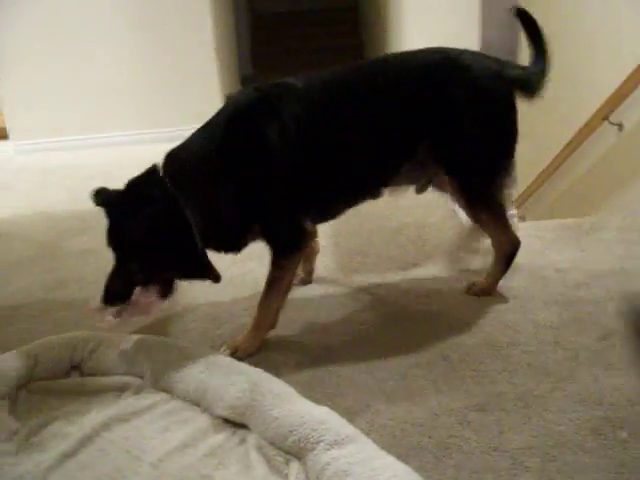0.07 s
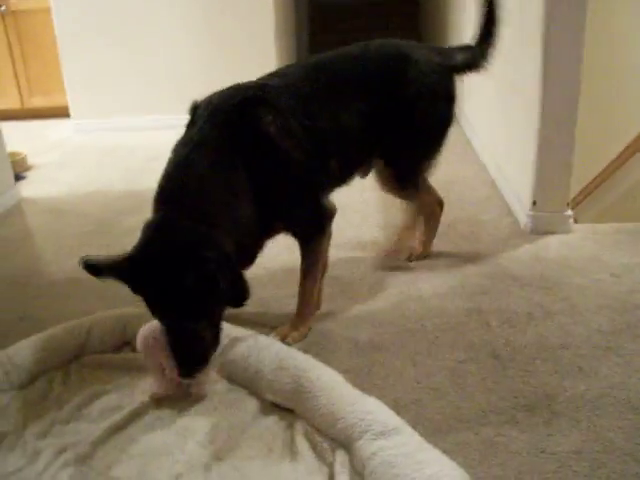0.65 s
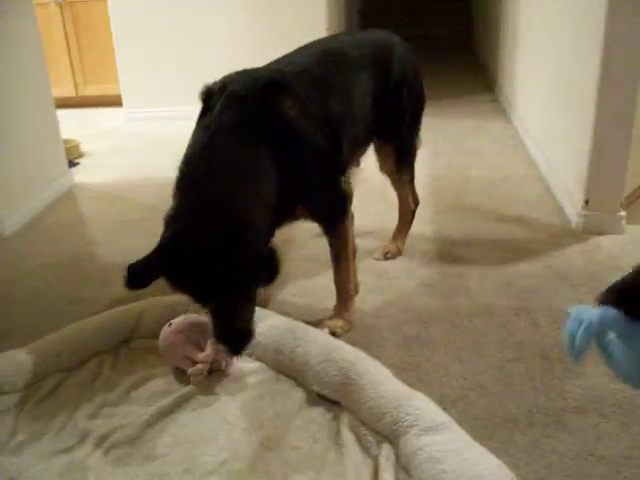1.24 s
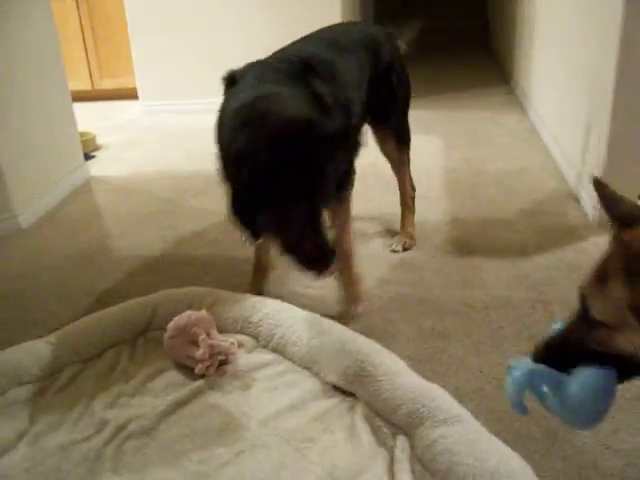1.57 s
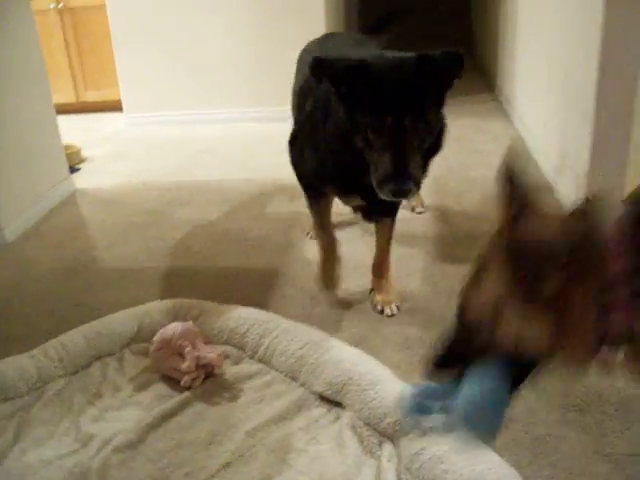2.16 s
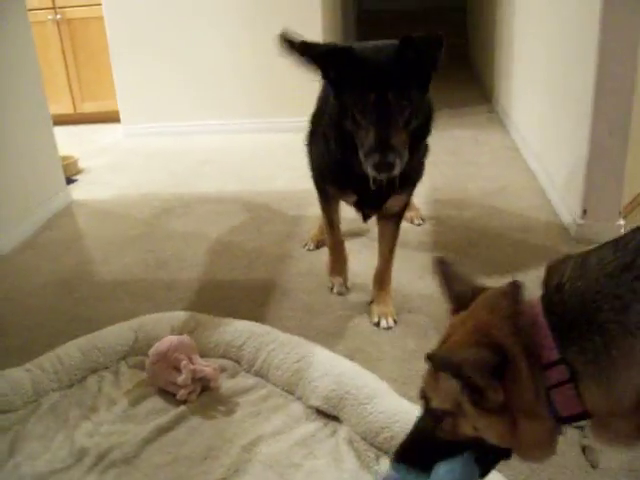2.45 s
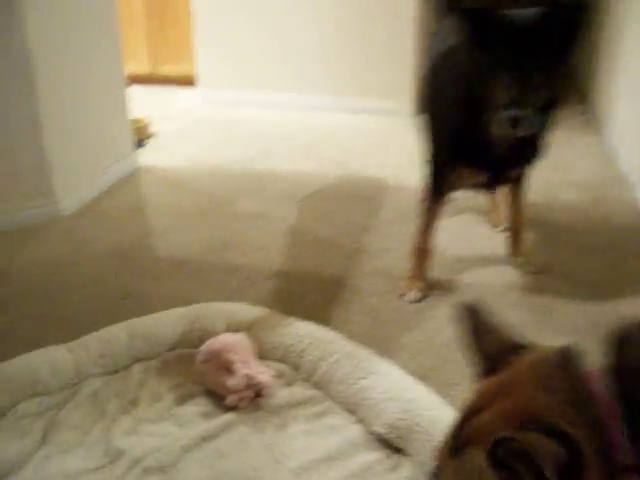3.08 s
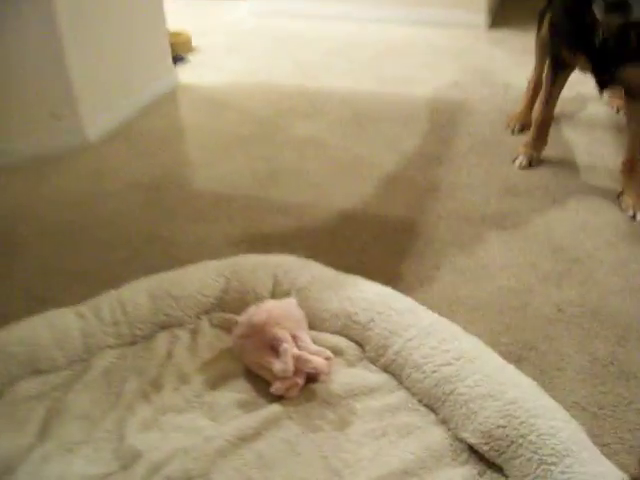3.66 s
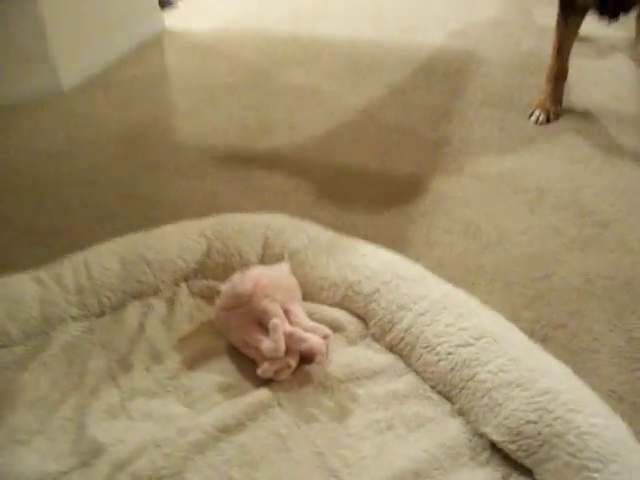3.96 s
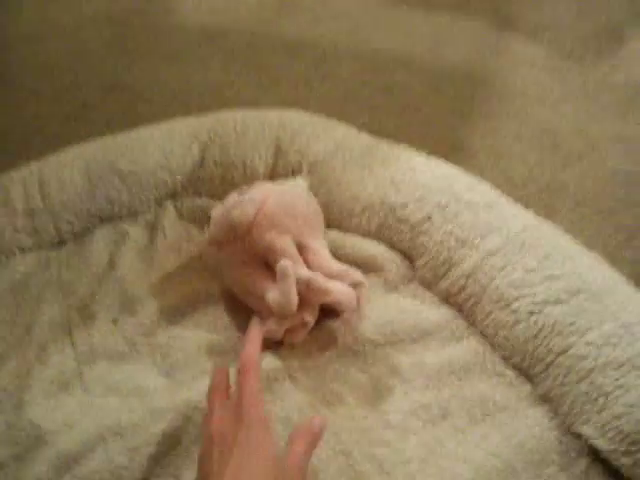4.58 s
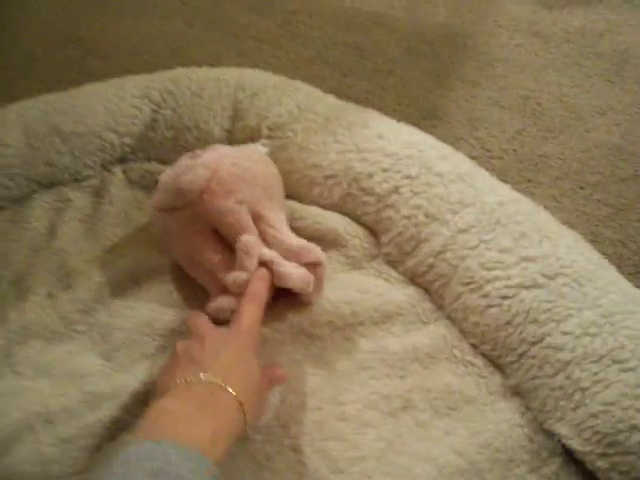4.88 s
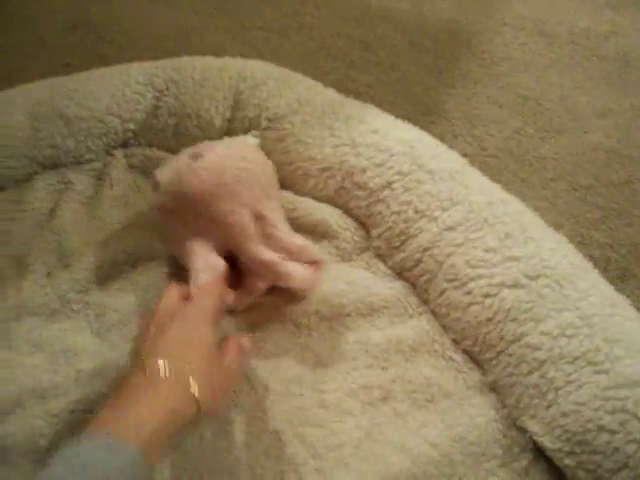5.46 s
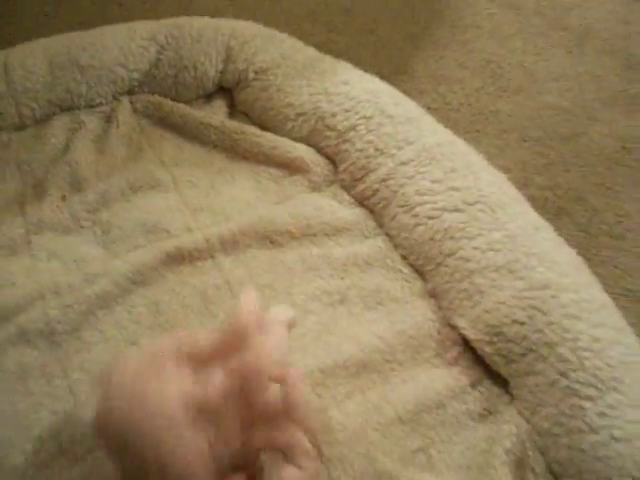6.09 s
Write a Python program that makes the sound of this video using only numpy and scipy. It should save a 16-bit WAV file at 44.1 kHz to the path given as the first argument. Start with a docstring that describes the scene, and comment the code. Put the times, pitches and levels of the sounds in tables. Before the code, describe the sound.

Dog collar tags jingle between quick chirps from a chewed squeaky toy, then give way to faint clicks and fabric rustle.

```python
"""Two dogs play on carpet, close to a hand-held camera that rumbles as it swings at the start. One chews
a plush toy: each bite drives air through the squeaker's reed, which chirps up, then down as the air runs
out; at 1 s a hard bite makes it whistle. Collar tags jingle hardest just before 2 s, jaws click, and a
hallway rings briefly behind them. The squeaks stop by 4 s, leaving a few clinks and clicks, soft thuds
and rustling plush. Near 6 s the toy is dragged over the dog bed."""
import sys
import numpy as np
from scipy import signal
from scipy.fft import rfft, irfft
from scipy.io import wavfile

SR = 44100
rng = np.random.default_rng(int(sys.argv[2]) if len(sys.argv) > 2 else 0)


def int16_out(signal):
    """Quantize to a 16-bit WAV file."""
    q = np.round(np.clip(np.atleast_2d(signal).T, -1, 1) * 32767)
    wavfile.write(sys.argv[1], SR, q.astype(np.int16))


N = 279143
TIME = np.arange(N) / SR

# colour of the room tone: (frequency [Hz], level [dB])
ROOM_TONE_EQ = [(12, -2.5), (22, 1), (50, -14), (120, -17.5), (160, -23.5), (240, -34), (450, -40),
                (700, -37.5), (2000, -57.5), (5000, -53), (7400, -38), (9000, -70.5)]
# soft thuds on the floor: (time [s], level [dB], pitch [Hz])
FLOOR_THUDS = [(4.051, -37.5, 60.4), (5.625, -46, 75), (6.000, -43, 109.4)]
# colour of rubbed plush: (frequency [Hz], level [dB])
PLUSH_EQ = [(80, -18.5), (150, 0.5), (300, 0), (465, -1.5), (650, -8.5), (1200, -8), (2700, -11),
            (7100, -10.5), (7900, -21), (9000, -36)]
# dull colour of the dog bed: (frequency [Hz], level [dB])
BED_EQ = [(80, -15), (160, -3), (450, -1), (700, -4.5), (1500, -8.5), (2800, -8.5), (5000, -13.5),
          (7400, -14.5), (9000, -36)]
# rubs of plush and bedding: (time [s], length [s], level [dB])
PLUSH_RUBS = [(0, 0.044, -49.5), (0.22, 0.59, -57.5), (1.2, 0.44, -58), (2.55, 0.29, -58.5),
              (3.4, 0.24, -54), (4.58, 0.19, -57.5), (5.17, 0.017, -63)]
# the toy drags over the bed, then shifts once more: (time [s], length [s], level [dB])
BED_DRAGS = [(5.861, 0.094, -49), (6.104, 0.011, -61)]
# clicks of teeth, claws and toy: (time [s], level [dB], register [Hz])
DRY_CLICKS = [(0.467, -44, 5500), (0.601, -39, 6200), (0.834, -35.5, 4500), (1.239, -35, 2180),
              (1.3024, -32, 3540), (1.3121, -31, 3500), (1.543, -31, 6500), (1.6122, -25.5, 2200),
              (1.629, -28.5, 2790), (1.658, -36, 5500), (1.6688, -17, 2600), (2.027, -37.5, 6060),
              (2.199, -36, 5030), (2.305, -37.5, 4200), (2.704, -29.5, 5700), (2.877, -34, 3500),
              (3.794, -35.5, 5000), (3.912, -26.5, 5500), (4.028, -36.5, 2500), (4.521, -39, 2490),
              (4.787, -33.5, 4460), (5.031, -42.5, 3080), (5.044, -32, 4620), (5.175, -34, 5800)]
# spells in which a dog moves and its collar jingles: (time [s], length [s], level [dB])
JINGLE_SPELLS = [(0.35, .6, -38.5), (1.279, .27, -39), (1.55, 0.41, -34.5), (1.939, .25, -50),
                 (4.1, 0.3, -46.5)]
# modes of two metal tags, a list for each: (frequency [Hz], level [dB], t60 [s])
TAG_MODES = [
    [(4190, -21, .1), (6740, -12, .1), (6965, 0, .25), (7060, -12, .2), (7450, -22, .15), (8030, -21, .12)],
    [(4479, -28, .7), (6842, -1, .19), (7130, -22, .25), (7989, -29, .5)],
]
# tag hits: (time [s], ring level [dB], second tag's share [0-1], free ring [s], tick level [dB])
TAG_CLINKS = [(0.022, -34, 0.6, 0.023, -33), (0.221, -29, .13, 0.063, -30), (0.403, -40.5, .2, .06, -53),
              (0.560, -25.5, 0.65, 0.0089, -33), (0.689, -33.5, 0.15, 0.014, -46),
              (0.701, -37.5, 0.14, 0.017, -28.5), (0.787, -39, 0.1, .08, -50),
              (0.874, -35, 0.12, .07, -38.5), (1.25, -42.5, 0.8, .1, -53), (1.400, -28.5, 0.77, .14, -51.5),
              (1.555, -35.5, .1, 0.011, -45), (1.5635, -32.5, 0.2, 0.014, -28),
              (1.577, -24, .3, 0.013, -26.5), (1.645, -20, 0.23, 0.0066, -22),
              (1.7155, -11.5, 0.82, 0.0072, -27.5), (1.757, -29, 0.16, 0.0099, -45.5),
              (1.830, -18.5, 1, 0.0076, -37), (1.873, -24, .2, 0.014, -21), (2.225, -32, 0.86, 0.0057, -44),
              (2.878, -20.5, 0.89, 0.1, -25), (3.890, -18, 0.81, 0.007, -29),
              (4.2996, -23, 0.56, 0.013, -25.5), (4.333, -22.5, 0.9, 0.0023, -35),
              (4.708, -31.5, 0.66, 0.026, -40)]
# the toy's plastic bulb buckles or springs back: (time [s], level [dB], pitch [Hz])
BULB_POPS = [(1.691, -31, 1410), (2.548, -32, 1064), (2.567, -39.5, 1050), (3.274, -23, 1130)]
# colour of the reed's overtones: (frequency [Hz], level [dB])
REED_EQ = [(900, 18.5), (2000, 0), (3000, -0.5), (4300, -1), (5200, -4), (6200, -1), (7500, 6), (8100, 0),
           (8700, -20)]
# puffs of air through the reed:
# (time [s], length [s], first pitch [Hz], last pitch [Hz], level [dB], peak place [0-1], brightness [dB])
REED_CHIRPS = [(0.0, 0.007, 1937, 1180, -30.5, 0.8, -2), (0.226, 0.012, 1177, 869, -23.5, 0.15, 3),
               (0.244, 0.017, 1070, 948, -33.5, .35, -1.5), (0.323, .021, 1165, 3150, -25, 0.67, -7),
               (0.391, 0.0062, 1893, 1256, -28, 0.6, -3.5), (0.972, .023, 1016, 882, -28.5, 0.72, -2),
               (1.040, 0.011, 1380, 2680, -21.5, 0.62, -6), (1.0979, 0.018, 1878, 1044, -26.5, 0, -5.5),
               (1.513, 0.017, 974, 1126, -48.5, 0.4, -20), (2.3457, 0.021, 1589, 1071, -16.5, 0.01, -1.5),
               (2.4725, 0.0063, 1800, 3020, -27.5, 0.46, -6.5),
               (2.5808, 0.0062, 1590, 1000, -32.5, 0, -7.5), (3.212, .019, 1394, 3390, -21.8, 0.58, -4),
               (3.2847, 0.0057, 1664, 1010, -26, .2, -5.5), (3.651, .031, 1181, 2088, -21, 0.63, -3.5),
               (3.679, 0.014, 2404, 990, -24.5, 0, -5.5)]


def undb(db):
    """Decibels to gain."""
    return 10 ** (np.asarray(db) / 20)


def unit(x):
    """Scale to rms 1."""
    return x / np.sqrt(np.mean(x ** 2))


def gain_at(eq, hz):
    """Gain of an EQ curve at a frequency."""
    f, db = np.transpose(eq)
    return undb(np.interp(np.log(hz + 1), np.log(f), db))


def colour(x, eq):
    """Shape a sound with an EQ curve; rms 1."""
    return unit(irfft(rfft(x) * gain_at(eq, np.fft.rfftfreq(len(x), 1 / SR)), len(x)))


def band(x, lo_hz, hi_hz):
    """Band-pass."""
    return signal.sosfilt(signal.butter(2, [lo_hz, min(hi_hz, .45 * SR)], "band", fs=SR, output="sos"), x)


def walk(per_s, size):
    """Smooth random modulation with a spread near 1."""
    knots = rng.standard_normal(4096)
    return 1.2 * np.interp(np.arange(size) / SR * per_s, np.arange(4096), knots)


def add(out, s, x):
    """Mix x in at time s."""
    i = max(int(s * SR), 0)
    out[i:i + len(x)] += x[:max(N - i, 0)]


def swell(s, length_s, attack_s, release_s):
    """An envelope that rises until s, holds for the length and fades out."""
    return np.clip(np.minimum(1 + (TIME - s) / attack_s, 1 - (TIME - s - length_s) / release_s), 0, 1)


def burst(lo_hz, hi_hz, t60):
    """A short crack of contact noise."""
    t = TIME[:4096]
    return unit(band(rng.standard_normal(len(t)), lo_hz, hi_hz)) * undb(-60 * t / t60)


def knock(hz, cycles):
    """A heavily damped swing of a soft body; its envelope peaks after the given cycles."""
    turns = TIME[:8192] * hz
    return np.sin(2 * np.pi * turns) * (turns / cycles) ** 2 * np.exp(2 - 2 * turns / cycles)


def room_tone(db=-48.5, whine_hz=6150, whine_db=-72.5):
    """A low, steady bed of noise with the camera's faint whine on top."""
    whine = undb(whine_db) * np.sqrt(2) * np.sin(2 * np.pi * whine_hz * TIME)
    return undb(db) * colour(rng.standard_normal(N), ROOM_TONE_EQ) + whine


def hallway(x, t60=0.38, wet_db=-11, early_db=-17, early_t60=0.13, gap_s=0.0028):
    """Reverb return: sparse near reflections and the diffuse ring of bare walls."""
    t = TIME[:SR]
    tail = colour(rng.standard_normal(SR), [(150, 13), (1200, 3.5), (2500, 1.5), (4500, -.5), (8000, -1.5)])
    tail = tail * undb(-60 * t / t60) * np.clip((t - gap_s) / gap_s, 0, 1)
    taps = rng.standard_normal(SR) * (rng.random(SR) < .01)
    early = taps * undb(-60 * t / early_t60) * (t > gap_s / 2)
    response = (undb(wet_db) * unit(tail) + undb(early_db) * unit(early)) / np.sqrt(SR)
    return signal.fftconvolve(x, response)[:N]


def rumble(handling_db=-58, swing_db=-43):
    """The low end: handling noise, stronger during the camera's opening swing, and thuds on the carpet."""
    shake = band(band(rng.standard_normal(N), 30, 85), 30, 85)
    swing = swell(0, length_s=0.17, attack_s=0.093, release_s=0.093)
    out = unit(shake) * (undb(handling_db) + undb(swing_db) * swing)
    for s, db, hz in FLOOR_THUDS:
        add(out, s, undb(db) * knock(hz, cycles=0.38))
    return out


def fabric(gain, eq, grain_db=1.5, flicker_db=1):
    """Fibres catch and slip in tiny grains as cloth rubs."""
    grains = rng.standard_normal(N) * undb(grain_db * walk(500, N))
    return colour(grains, eq) * gain * undb(flicker_db * walk(25, N))


def rustle(scuffle_s=4.76, scuffle_db=-59.5, stir_db=-62.5):
    """Single rubs over scuffling paws and a constant stir of cloth, then the toy dragged over the bed."""
    moves = list(PLUSH_RUBS) + [(0, scuffle_s, scuffle_db)]
    power = sum((undb(db) * swell(s, length_s, attack_s=0.11, release_s=0.085)) ** 2
                for s, length_s, db in moves)
    drag = sum(undb(db) * swell(s, length_s, attack_s=0.2, release_s=0.066)
               for s, length_s, db in BED_DRAGS)
    return fabric(np.sqrt(power + undb(stir_db) ** 2), PLUSH_EQ) + fabric(drag, BED_EQ)


def clicks(trim_db=-5, t60=0.012):
    """Teeth, claws and toy make dry little clicks, each in its own register."""
    out = np.zeros(N)
    for s, db, hz in DRY_CLICKS:
        add(out, s, undb(db + trim_db) * burst(hz / 2, hz * np.sqrt(2), t60))
    return out


def collar_fittings(per_s=90, t60=0.026, spread_db=5, trim_db=-11):
    """Small fittings touch at random, each with a brief ping of two unrelated partials."""
    out, t = np.zeros(N), TIME[:4096]
    for s, length_s, spell_db in JINGLE_SPELLS:
        for when, low, high, softness in rng.random((int(per_s * length_s), 4)):
            db = spell_db + trim_db - spread_db * np.log(softness + 0.14)
            low_hz, high_hz = 3200 + 3000 * low, 6300 + 1500 * high
            ping = .5 * np.sin(2 * np.pi * low_hz * t) + np.sin(2 * np.pi * high_hz * t)
            add(out, s + when * length_s, undb(db - 60 * t / t60) * ping)
    return out


def light_touches(per_s=12, ring_db=-3, tick_db=-10, share=0.19, free_s=0.063):
    """Cues for faint tag clinks, scattered through each spell of jingling."""
    cues = []
    for s, length_s, db in JINGLE_SPELLS:
        count = max(round(per_s * length_s), 1)
        for when in (np.arange(count) + rng.random(count)) / count:
            cues.append((s + when * length_s, db + ring_db, share, free_s, db + tick_db))
    return cues


def collar_tags(damped_t60=0.014, scatter_db=1, detune=0.001, tick_trim_db=-6, wobble_db=2.5):
    """Two metal tags strike, swing and ring for a moment, then lie against each other and die away."""
    out, t = np.zeros(N), TIME[:SR // 2]
    attack = np.sin(np.pi / 2 * np.minimum(t / .001, 1)) ** 2
    for s, db, share, free_s, tick_db in list(TAG_CLINKS) + light_touches():
        choke_db = -60 * np.maximum(t - free_s, 0) / damped_t60
        ring = 0
        for modes, weight in zip(TAG_MODES, (1 - share, share)):
            for hz, mode_db, t60 in modes:
                level_draw, pitch_draw = rng.standard_normal(2)
                fade_db = choke_db * (hz / 7000) ** 1.8 - 60 * t / t60  # high modes choke first
                partial = np.sin(2 * np.pi * hz * (1 + detune * pitch_draw) * t)
                ring = ring + weight * undb(mode_db + scatter_db * level_draw + fade_db) * partial
        add(out, s, attack * ring * undb(db + wobble_db * walk(90, len(t))))
        add(out, s, undb(tick_db + tick_trim_db) * burst(4100, 7640, t60=0.028))
    return out


def reed(t, hz, db, bright_db, edge_s=0.00071, jitter=0.022, flutter_db=3.5, air_db=-21, rasp_db=-0.36):
    """The reed slaps shut once a cycle: a bright stack of harmonics, with air hissing through the gap."""
    # a loose, low reed rattles; blown hard, it locks into a clean whistle
    loose = np.clip((2900 - hz) / 1000, .15, 1)
    phase = 2 * np.pi * np.cumsum(hz * (1 + jitter * loose * walk(1200, len(t)))) / SR
    k = np.arange(1, 10)[:, None]
    overtones = undb(bright_db - 2.6 * np.log2(k)) * gain_at(REED_EQ, k * hz)
    high_cut = np.clip((8400 - k * hz) / 400, 0, 1)
    flutter = undb(flutter_db * loose * np.array([walk(188.5, len(t)) for _ in k]))
    weights = np.where(k == 1, 1, overtones) * high_cut * flutter
    tone = (weights * np.sin(k * phase)).sum(0) / np.sqrt((weights ** 2).sum(0) / 2)
    air = unit(band(rng.standard_normal(len(t)), 1400, 13000)) * (1 + np.cos(phase))
    fades = np.clip(np.minimum(t, t[-1] - t) / edge_s, 0, 1)
    return (tone + undb(air_db) * air) * undb(db + rasp_db * loose * walk(900, len(t))) * fades


def chirp(length_s, first_hz, last_hz, db, peak, bright_db, glide_bend=1.1, roundness=0.66):
    """One puff of air: the reed's period glides from first to last while the level swells and falls."""
    t = TIME[:int(length_s * SR)]
    progress = t / t[-1]
    period = 1 / first_hz + (1 / last_hz - 1 / first_hz) * progress ** glide_bend
    arch = np.sin(np.pi * np.interp(progress, [0, np.clip(peak, .02, .98), 1], [.02, .5, .98]))
    return reed(t, 1 / period, db + 20 * roundness * np.log10(arch), bright_db)


def whistle(length_s=0.048, reed_hz=2815, waver_hz=55, wavers_per_s=21, brighten_db_per_s=575):
    """A hard bite holds the reed near its own pitch; it sags, recovers and brightens as pressure builds."""
    t = TIME[:int(length_s * SR)]
    hz = reed_hz + waver_hz * np.cos(2 * np.pi * wavers_per_s * t)
    return reed(t, hz, db=-24.5, bright_db=-15.5 + brighten_db_per_s * t)


def squeaky_toy(whistle_at_s=1.052):
    """Chirps on bite and release, one whistle, and the pops of the plastic bulb."""
    out = np.zeros(N)
    for s, *puff in REED_CHIRPS:
        add(out, s, chirp(*puff))
    add(out, whistle_at_s, whistle())
    for s, db, hz in BULB_POPS:
        add(out, s, undb(db) * (knock(hz, cycles=1.7) + 0.63 * knock(hz / 3, cycles=0.21)))
    return out


def scene():
    """Toy, collar and clicks up front with a send to the hallway, over rustle, rumble and room tone."""
    toy = squeaky_toy()
    dogs = collar_tags() + collar_fittings() + clicks()
    toy_send = undb(5 - 2.5 * TIME)  # the toy dries up as the dog carries it closer
    reverb = hallway(toy * toy_send + dogs)
    return (room_tone() + reverb + rustle() + rumble() + dogs + toy)[None]


def record(dry, top_hz=8550):
    """The camera's narrow sound channel cuts the top."""
    return signal.sosfilt(signal.ellip(8, .3, 62, top_hz, fs=SR, output="sos"), dry)


dry = scene()
out = record(dry)
int16_out(out)
```